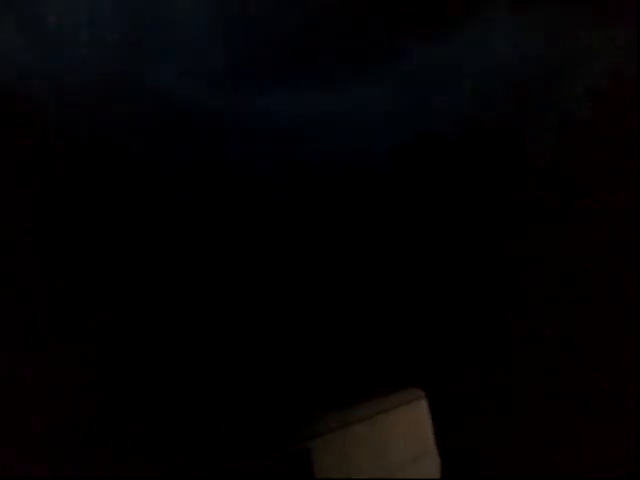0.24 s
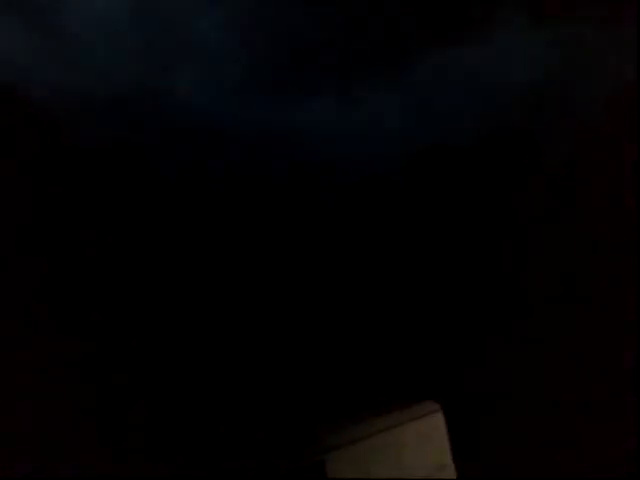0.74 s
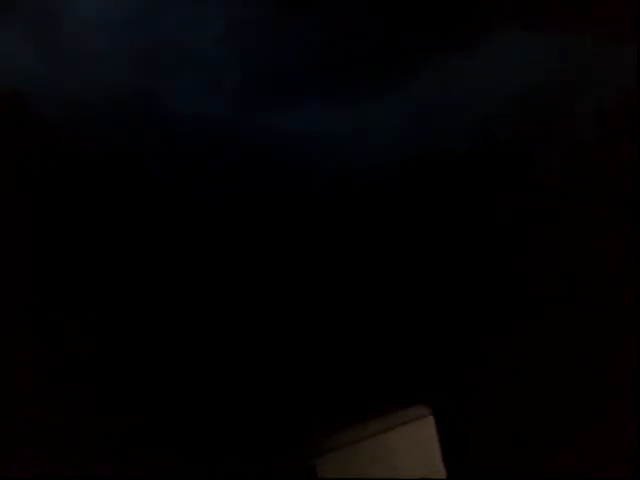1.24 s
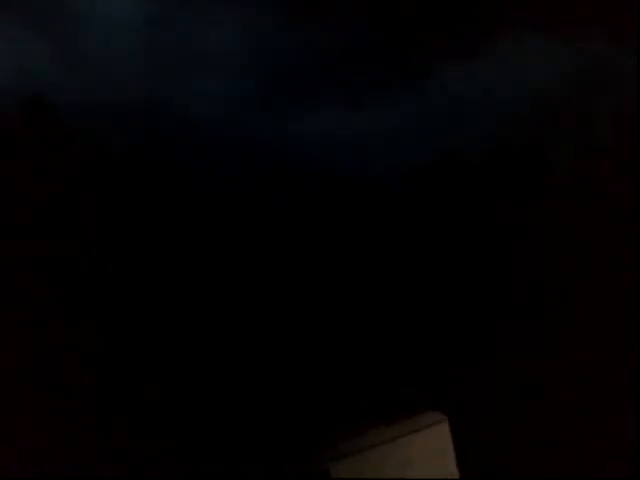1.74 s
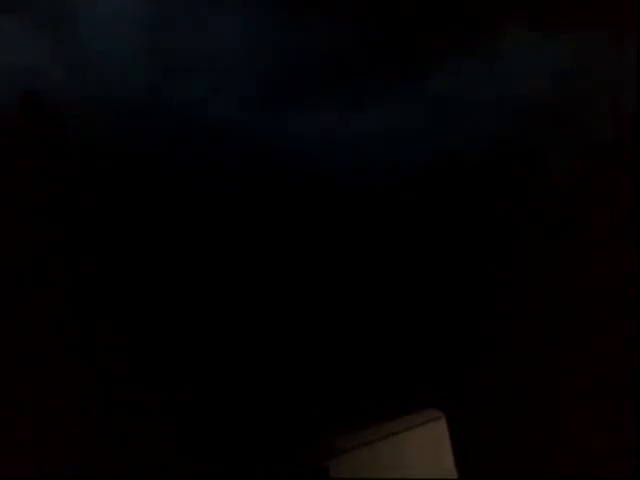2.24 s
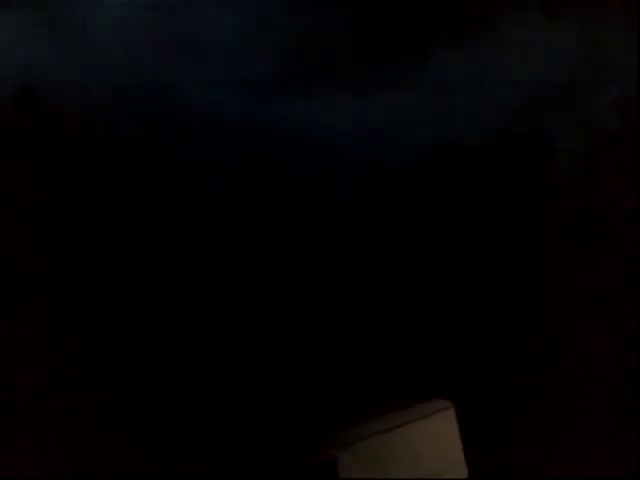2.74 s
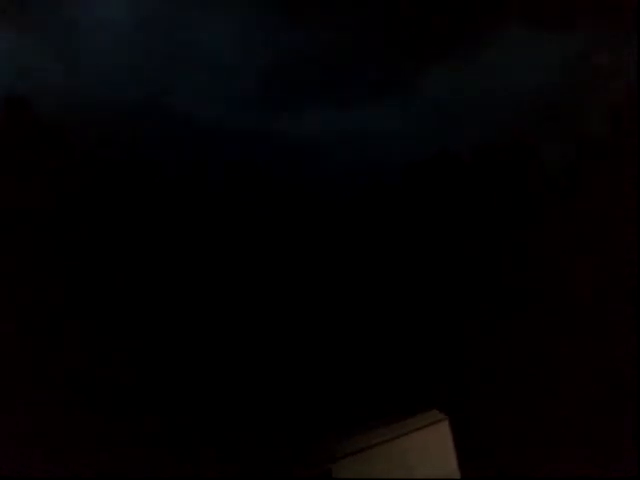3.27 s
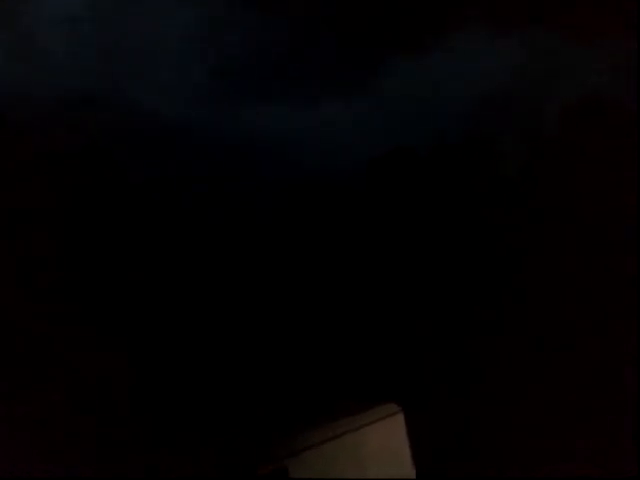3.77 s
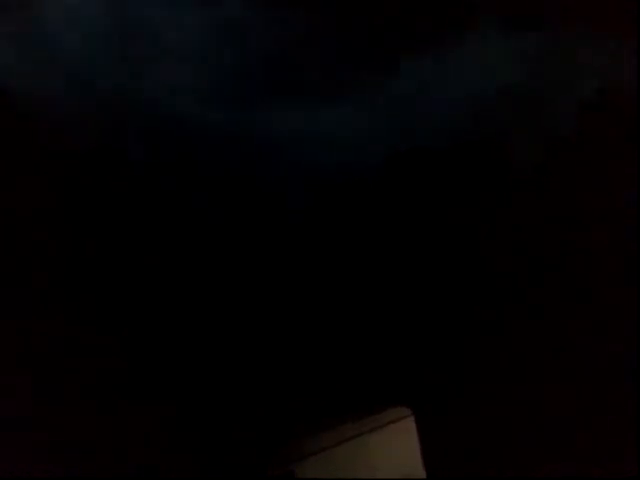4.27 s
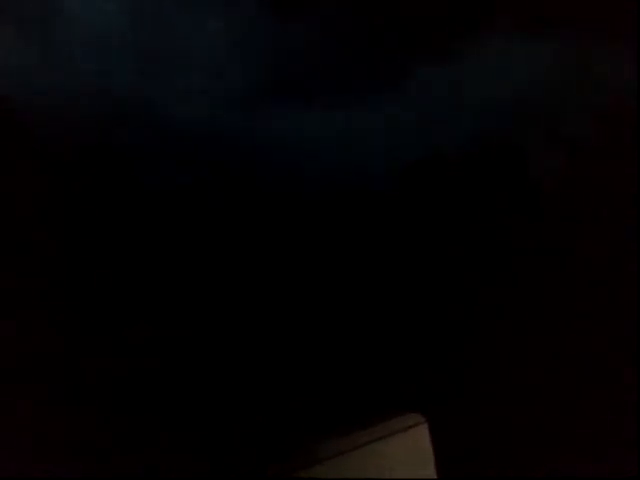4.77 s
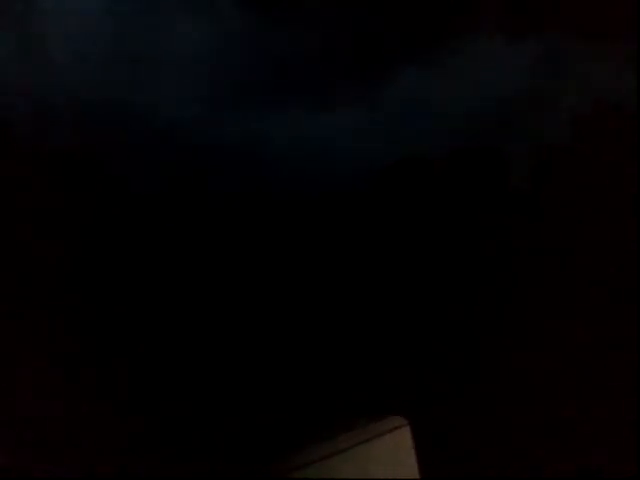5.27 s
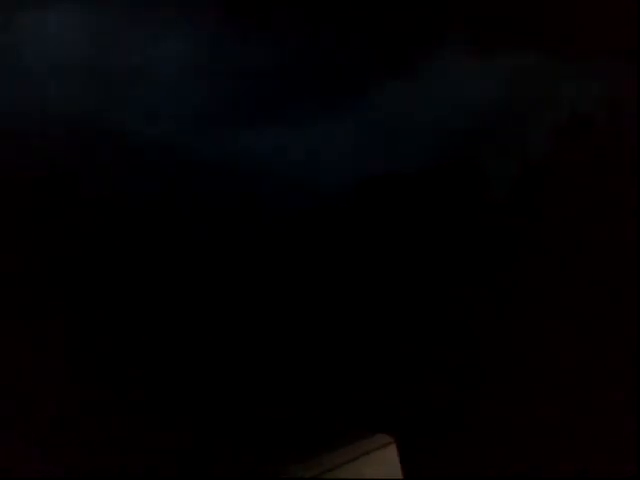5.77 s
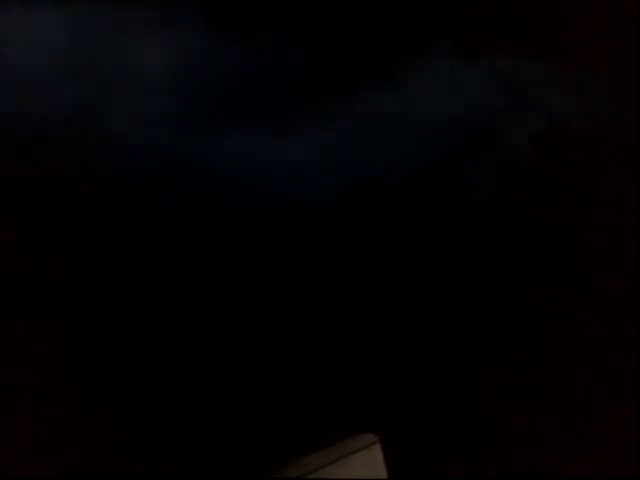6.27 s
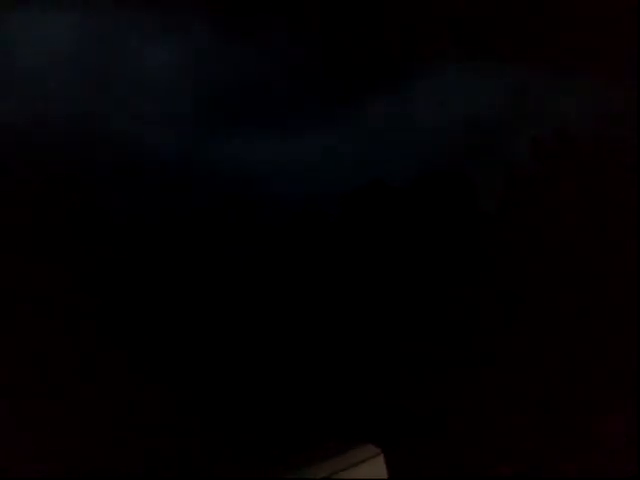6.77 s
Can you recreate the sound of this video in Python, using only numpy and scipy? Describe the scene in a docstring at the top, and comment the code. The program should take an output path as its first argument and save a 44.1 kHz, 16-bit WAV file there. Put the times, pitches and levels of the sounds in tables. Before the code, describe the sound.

Steady rain outdoors at night: a soft even wash of distant drops under a fine, crisp patter of nearer ones. A short low rumble buffets the microphone at once, then another, lumpier, near three seconds, with a sharp close splash. Scattered drips and small splats continue, with faint dull thuds far off.

```python
"""Steady night rain outdoors in a storm: filtered noise for a wash of far drops, filtered random
clicks and short rings for a patter of near ones. Now and then gathered water splats on the ground
as a decaying spray of clicks, once close by; single drips tick and ring. Two short low rumbles pass,
most likely gusts that buffet the microphone: shaped low noise with separate thumps.
Dull thuds (low noise bursts) and a faint hum (a few harmonics) lie further off."""
import sys
import numpy as np
from scipy import signal
from scipy.fft import rfft, irfft, next_fast_len
from scipy.io import wavfile
from scipy.ndimage import uniform_filter1d

SR = 44100
rng = np.random.default_rng(int(sys.argv[2]) if len(sys.argv) > 2 else 0)


def generate_wav(sig):
    """Save sig (samples, or channels by samples) to the path in sys.argv[1] as 16-bit PCM at SR."""
    pcm = np.round(np.clip(np.atleast_2d(sig).T, -1, 1) * 32767).astype(np.int16)
    wavfile.write(sys.argv[1], SR, pcm)


N = 309141
TIME = np.arange(N) / SR  # s

# Spectrum of water splashing close by. Each row: frequency in Hz, relative density in dB per Hz.
SPLASH_SPECTRUM = [(200, -13), (700, -7), (1400, -6.5), (2300, 0.5), (3000, -1), (3750, -2.5), (4500, -8.5),
                   (6600, -7), (7500, -16), (9000, -48)]


def gain_of(db):
    """Converts decibels to an amplitude factor."""
    return 10 ** (np.asarray(db) / 20)


def evened(x):
    """Scales to rms 1."""
    return x / np.sqrt(np.mean(x ** 2) + 1e-20)


def read(points, hz):
    """Interpolates a spectrum on a log-frequency axis."""
    point_hz, value = np.transpose(points)
    return np.interp(np.log(hz + 1), np.log(point_hz + 1), value)


def add(mix, start_s, sound):
    """Mixes a sound in at a start time, in place."""
    part = mix[max(round(start_s * SR), 0):][:len(sound)]
    part += sound[:len(part)]


def coloured(x, points, tilt_db=0, lifts=()):
    """Filters x by a spectrum, a tilt in dB per octave above 500 Hz and band lifts; rms 1."""
    size = next_fast_len(len(x))
    hz = np.fft.rfftfreq(size, 1 / SR)
    db = read(points, hz) + tilt_db * np.log2(np.maximum(hz, 500) / 500)
    for centre_hz, width_hz, lift_db in lifts:
        db = db + lift_db / (1 + (2 * (hz - centre_hz) / width_hz) ** 4)
    return evened(irfft(rfft(x, size) * gain_of(db), size)[:len(x)])


def wander(rate_hz):
    """Random fluctuation of rms 1, weak below 1 Hz and rolling off around rate_hz."""
    hz = np.fft.rfftfreq(N, 1 / SR)
    shape = hz / (hz + 1) / (1 + (hz / rate_hz) ** 2)
    return evened(irfft(rfft(rng.standard_normal(N)) * shape, N))


def impacts(size, per_s, spread_db):
    """Random clicks of either sign, most small and a few large."""
    height = gain_of(spread_db * np.minimum(rng.exponential(1, size), 5))
    sign = rng.choice([-1, 1], size)
    return evened_free(height * sign, size, per_s)


def evened_free(clicks, size, per_s):
    """Keeps a random per_s clicks a second on average, at unchanged height."""
    return clicks * (rng.random(size) < per_s / SR)


def swell(crest_s, rise_s, fall_s):
    """A smooth bell in time, of height 1, with its own rise and fall."""
    return np.exp(-((TIME - crest_s) / np.where(TIME < crest_s, rise_s, fall_s)) ** 2)


def hum(base_hz=49.5, waver=0.0093, flutter_db=3):
    """A few low harmonics, perhaps a far engine, that swell once and fade."""
    # Each row: harmonic number, relative level in dB.
    harmonics = [(2, -1.5), (3, -4.5), (4, -1), (6, -4.5)]
    floor_db, swell_db, crest_s, swell_s = -65, -62, 5.08, 0.9
    turns = np.cumsum(base_hz * (1 + waver * wander(3.2))) / SR
    lines = sum(np.sin(2 * np.pi * k * turns) * gain_of(db + flutter_db * wander(4)) for k, db in harmonics)
    return lines * (gain_of(floor_db) + gain_of(swell_db) * swell(crest_s, swell_s, swell_s))


def thuds(t60_s=0.37, rise_s=0.0059):
    """Dull thuds further off: low noise bursts that die away quickly."""
    # Each row: start in seconds, level before the decay in dB.
    knocks = [(4.428, -43.5), (4.465, -46), (4.69, -43.5), (5.135, -49), (5.744, -46)]
    # Each row: frequency in Hz, relative density in dB per Hz.
    spectrum = [(60, -30), (110, -16), (150, -12), (215, 2.5), (260, -15), (340, -2.5), (450, -18),
                (900, -46)]
    out, t = np.zeros(N), TIME[:SR // 3]
    for start_s, db in knocks:
        envelope = (1 - np.exp(-t / rise_s)) * gain_of(db - 60 * t / t60_s)
        add(out, start_s, coloured(rng.standard_normal(len(t)), spectrum) * envelope)
    return out


def buffets(waver=0.16, steepen=0.48):
    """Each eddy that hits the microphone swings the pressure to and fro, steepest at its height."""
    # Thumps of air. Each row: middle in seconds, peak in dB, mean pitch in Hz, sech length in seconds.
    eddies = [(0.136, -15.5, 145, .007), (0.2, -13, 243, 0.0038), (0.255, -14.5, 250, 0.0039),
              (.275, -15.5, 165, 0.0034), (0.31, -20, 170, 0.0014), (0.358, -28, 100, 0.0059),
              (2.613, -13.5, 140, 0.0019), (2.627, -20.5, 251, 0.0043), (2.727, -24.5, 135, 0.0018),
              (2.781, -23, 105, 0.0021), (2.975, -16.5, 160, 0.0019), (3.006, -18, 202, .003),
              (3.029, -22.5, 150, .0017), (3.072, -21, 220, 0.0013), (3.115, -21, 150, 0.0016),
              (3.159, -24.5, 130, 0.0024), (3.206, -26, 160, 0.0018), (3.33, -13.5, 185, 0.0014),
              (3.367, -18.5, 185, .0014)]
    out, t = np.zeros(N), TIME[:SR // 8]
    middle_s = t.mean()
    for at_s, db, hz, length_s in eddies:
        turns = np.cumsum(hz * (1 + waver * wander(100)[:len(t)])) / SR
        angle = 2 * np.pi * (turns - turns[len(t) // 2])
        force = 1 / np.cosh((t - middle_s) / length_s)
        swing = -force * np.sin(angle + steepen * force * np.sin(angle))
        add(out, at_s - middle_s, gain_of(db) * swing / abs(swing).max())
    return out


def gusts(churn_db=-1, lumpy_db=4.0, flutter_db=1.0):
    """Churning air rumbles as each gust swells and drops; its strongest eddies thump."""
    # Each row: crest in seconds, level in dB before churn_db, rise in seconds, fall in seconds.
    gust_rows = [(.21, -27, 0.16, .115), (.9, -50.5, 0.035, 0.11), (2.615, -29.5, 0.042, 0.04),
                 (2.78, -36.5, 0.1, 0.18), (3.03, -30, 0.078, 0.15), (3.335, -24.5, 0.038, 0.063),
                 (3.555, -46, 0.019, 0.072)]
    # Churning and hard-buffet flutter. Each row: frequency in Hz, relative density in dB per Hz.
    rumble_spectrum, flutter_spectrum = [(20, -8.5), (50, -1), (90, 2.5), (150, -2), (240, -8.5),
                                         (330, -14.5), (450, -27.5), (700, -37.5), (1200, -63.5)], [(120, -22.5), (260, -1), (400, -2), (620, -8),
                                                         (800, -10.5), (1200, -33), (2000, -70)]
    breeze_db, breeze_drop_db_per_s = -52.5, 1.56  # breeze between gusts, before churn_db
    wind = gain_of(breeze_db - breeze_drop_db_per_s * TIME)
    for crest_s, db, rise_s, fall_s in gust_rows:
        wind = wind + gain_of(db) * swell(crest_s, rise_s, fall_s)
    churn = coloured(rng.standard_normal(N), rumble_spectrum)
    # steadied, so that the wind alone sets the level
    churn = churn / np.sqrt(uniform_filter1d(churn ** 2, size=1500) + 1e-9)
    rumble = churn * wind * gain_of(churn_db + lumpy_db * wander(40)) + buffets()
    # hard buffets shed small, fast eddies, so the rumble brightens with its power
    power = uniform_filter1d(rumble ** 2, size=600)
    flutter = coloured(rng.standard_normal(N), flutter_spectrum)
    return rumble + gain_of(flutter_db) * power * flutter


def drips(tick=0.24, tick_s=0.00082, rise_s=0.0002):
    """A drip close by ticks and rings for a few cycles."""
    # Each row: start in seconds, level before rise and decay in dB, pitch in Hz, t60 in seconds.
    drops = [(.301, -22, 7000, 0.0078), (1.6004, -24, 6360, 0.0093), (3.6314, -24, 6300, 0.006),
             (5.131, -34.5, 3750, .05), (6.0957, -20, 3640, 0.01), (6.806, -30, 4700, 0.012)]
    out, t = np.zeros(N), TIME[:SR // 20]
    for start_s, db, hz, t60_s in drops:
        ring = np.sin(2 * np.pi * hz * t) * gain_of(-60 * t / t60_s)
        crack = tick * coloured(rng.standard_normal(len(t)), SPLASH_SPECTRUM) * np.exp(-t / tick_s)
        add(out, start_s, gain_of(db) * (ring + crack) * (1 - np.exp(-t / rise_s)))
    return out


def splash(start_s=3.2905, crest_db=-25.5, ragged_db=0.5, rise_s=.001):
    """A larger pour lands nearby, swells while the water pours, then crackles away."""
    # Bands that ring in the splash. Each row: centre in Hz, width in Hz, lift in dB.
    rings = [(2246, 48, 4), (2740, 70, 3), (3340, 50, 5), (3750, 250, 0.5)]
    swell_s, swell_db, t60_s = .015, 3.5, .28
    out, t = np.zeros(N), TIME[:SR // 4]
    spray = coloured(impacts(len(t), per_s=3500, spread_db=1.0), SPLASH_SPECTRUM, lifts=rings)
    db = np.minimum(swell_db * (t / swell_s - 1), -60 * (t - swell_s) / t60_s)
    level = gain_of(crest_db + db + ragged_db * wander(150)[:len(t)])
    add(out, start_s, spray * (1 - np.exp(-t / rise_s)) * level)
    return out


def splats(rise_s=.003, t60_s=0.29):
    """Gathered water lands further off, each lump a spray of droplet clicks that dies away."""
    # Each row: start in seconds, level before the decay in dB, tilt in dB per octave.
    lumps = [(.628, -35, 3), (1.215, -38.5, 6), (1.665, -37, 0.5), (3.201, -33, 8), (3.44, -37.5, 3),
             (3.903, -34.5, 1), (4.128, -34.5, 3), (4.685, -37, 7), (5.128, -33, -1.5), (5.176, -36, 0.5),
             (5.736, -37, -1.5), (6.097, -40, -5.5), (6.518, -36, 2), (6.796, -36.5, 2.5),
             (6.952, -36.5, 4.5)]
    # Each row: frequency in Hz, relative density in dB per Hz.
    spectrum = [(40, -35.5), (150, -9), (500, -5), (1400, -2), (2200, 1), (3000, -2.5), (3750, -1.5),
                (4600, -3), (6600, 0), (7400, -8.5), (8200, -23), (9000, -37.5)]
    out, t = np.zeros(N), TIME[:SR // 3]
    for start_s, db, tilt_db in lumps:
        spray = coloured(impacts(len(t), per_s=5000, spread_db=1.0), spectrum, tilt_db)
        add(out, start_s, spray * (1 - np.exp(-t / rise_s)) * gain_of(db - 60 * t / t60_s))
    return out


def plinks(ring_s=0.0021, count=28):
    """Some drops ring for a moment, each at one of count pitches."""
    t = TIME[:SR // 60]
    pitches_hz = np.linspace(1200, 8400, count) * rng.uniform(.97, 1.03, count)
    rings = np.sin(2 * np.pi * pitches_hz[:, None] * t) * np.exp(-t / ring_s)
    clicks = impacts(N, per_s=900, spread_db=4.0)
    kind = rng.integers(0, count, N)
    out = np.zeros(N)
    for at in np.flatnonzero(clicks):
        add(out, at / SR, clicks[at] * rings[kind[at]])
    return out


def rain(wash_db=-41.5, patter_db=-45, plink_db=-50, wash_sway_db=0.56, patter_sway_db=2.5):
    """Far drops merge into a wash; near ones tick in flurries, and some ring."""
    # How hard it rains. Each row: time in seconds, level in dB, of which only the changes count.
    rainfall = [(0.0, -39.5), (0.56, -39), (2.13, -40), (2.63, -39.5), (5.21, -38.5), (6.3, -39.5),
                (7.0, -39.5)]
    # Far and near drops. Each row: frequency in Hz, relative density in dB per Hz.
    wash_spectrum, patter_spectrum = [(20, -22.5), (45, -5), (100, -3.5), (160, -4.5), (220, -2.5),
                                      (330, -7.5), (550, -3.5), (1400, -4.5), (2100, -2), (3200, -4.5),
                                      (5300, -6), (6500, -5), (7400, -9), (9000, -39.5)], [(300, -22), (900, -1.5), (2200, -2), (3100, 0),
                                                    (5000, -0.5), (6500, 3.5), (7300, -3), (8200, -11.5),
                                                    (9000, -26)]
    # Resonances that colour the rain. Each row: centre in Hz, width in Hz, lift in dB.
    resonances = [(2200, 450, 1.5), (2268, 35, 2.5), (3145, 790, -3), (3300, 37, 2), (6600, 1600, 3.5)]
    time_s, db = np.transpose(rainfall)
    strength = gain_of(np.interp(TIME, time_s, db - db.mean()))
    wash = coloured(rng.standard_normal(N), wash_spectrum, lifts=resonances)
    wash = wash * gain_of(wash_db + wash_sway_db * wander(11))
    drops = impacts(N, per_s=3000, spread_db=1.5) * gain_of(patter_sway_db * wander(15))
    patter = gain_of(patter_db) * coloured(drops, patter_spectrum, lifts=resonances)
    ringing = gain_of(plink_db) * coloured(plinks(), patter_spectrum, lifts=resonances)
    return strength * (wash + patter + ringing)


def scene():
    """Rain, falling water, gusts and far noises at one microphone."""
    return (rain() + splats() + splash() + drips() + gusts() + thuds() + hum())[None]


def record(dry, edge_hz=9050):
    """The recorder's band limit: a linear-phase low-pass."""
    lowpass = signal.firwin(401, edge_hz, window=("kaiser", 9), fs=SR)
    return signal.oaconvolve(dry, lowpass[None], "same")


dry = scene()
out = record(dry)
generate_wav(out)
```